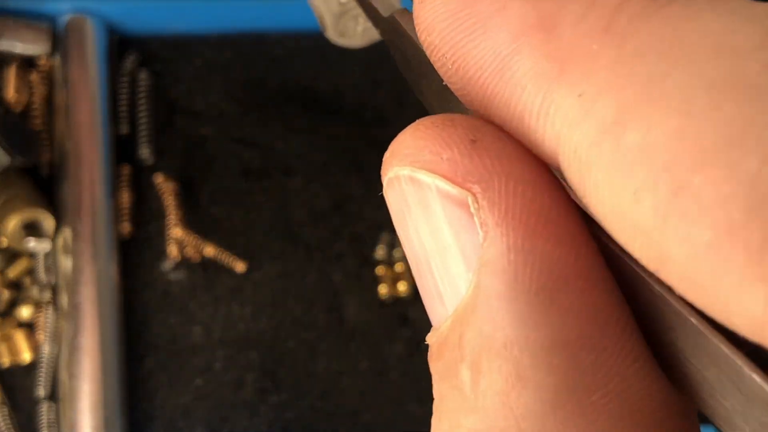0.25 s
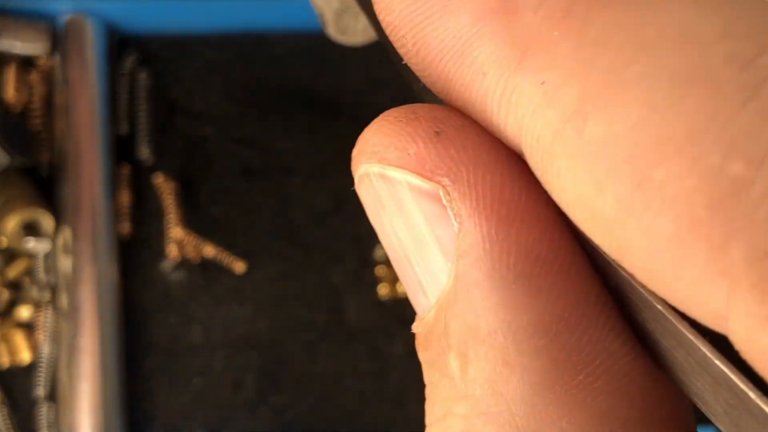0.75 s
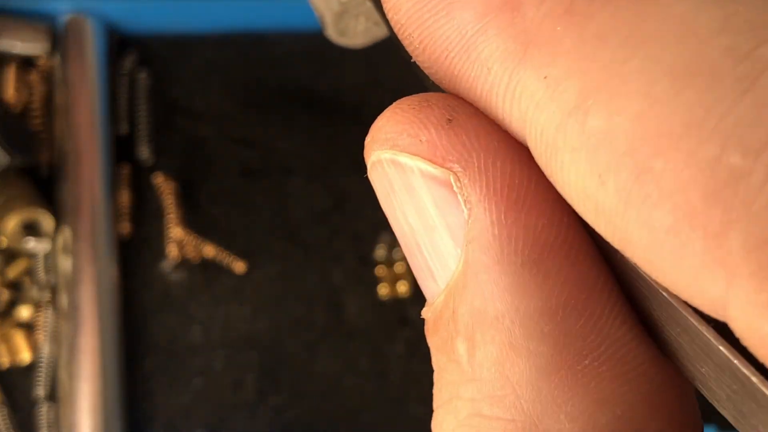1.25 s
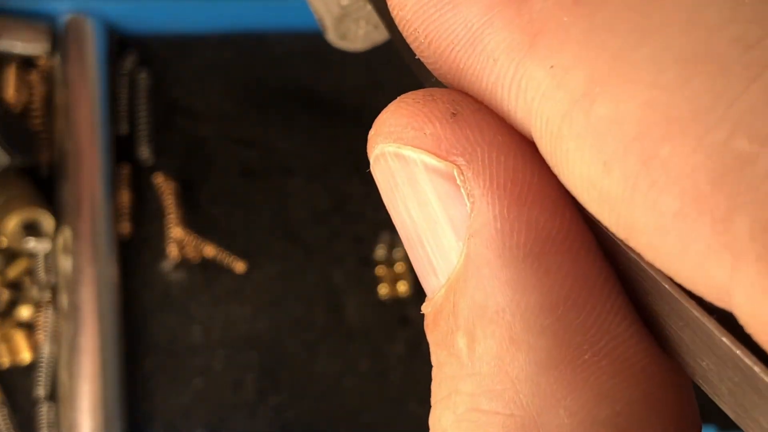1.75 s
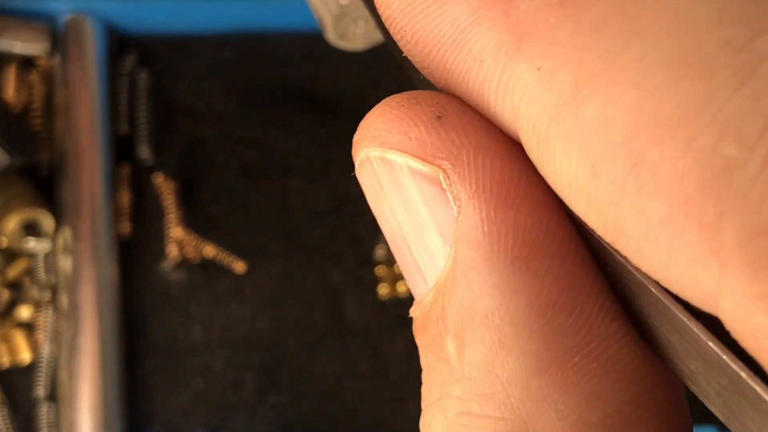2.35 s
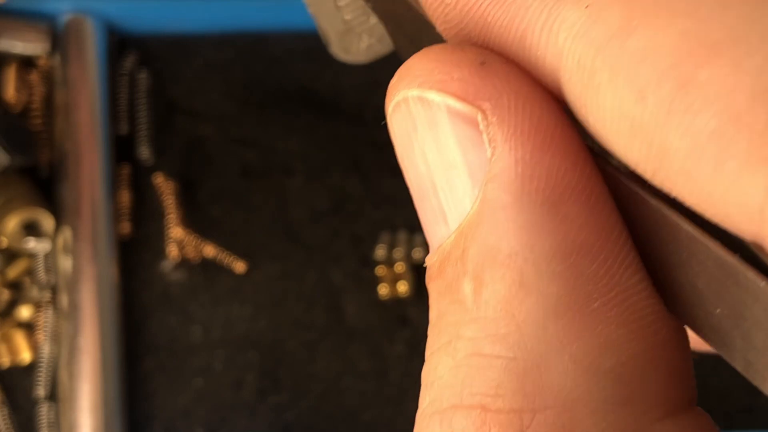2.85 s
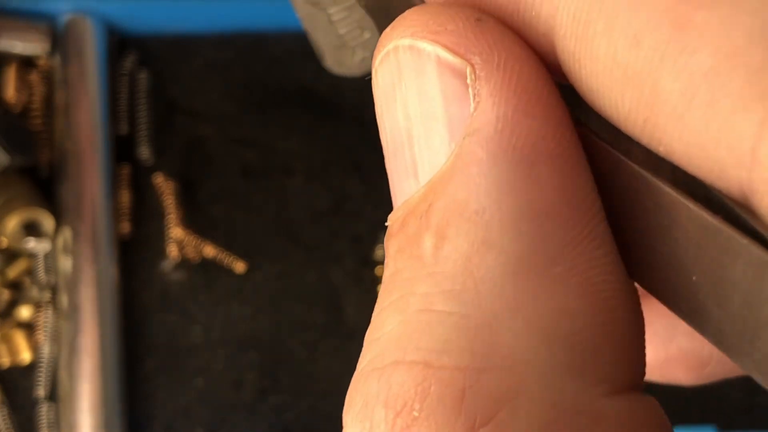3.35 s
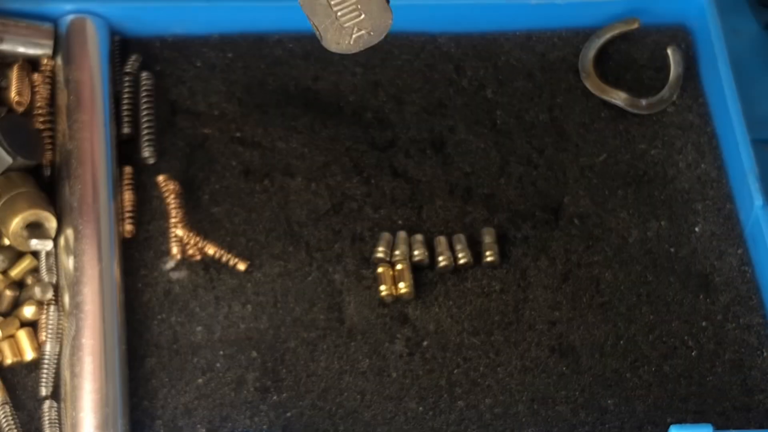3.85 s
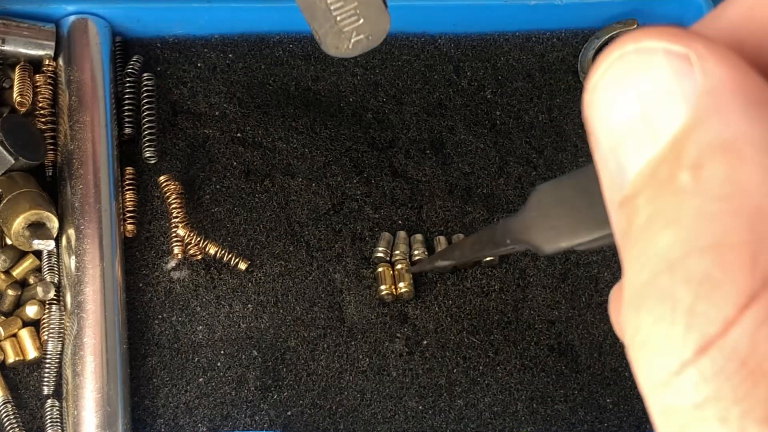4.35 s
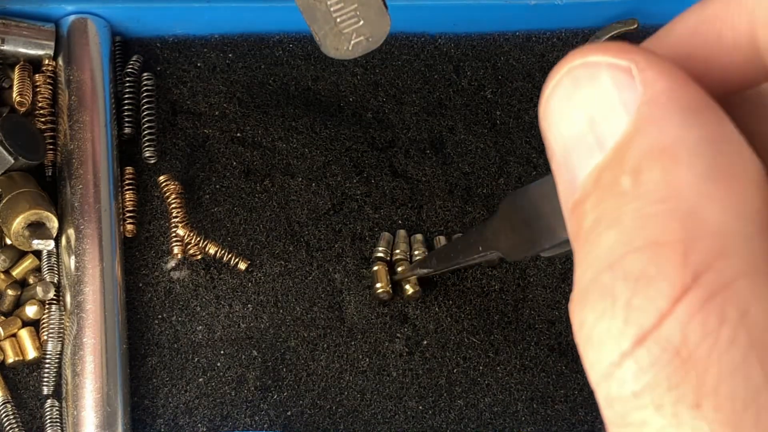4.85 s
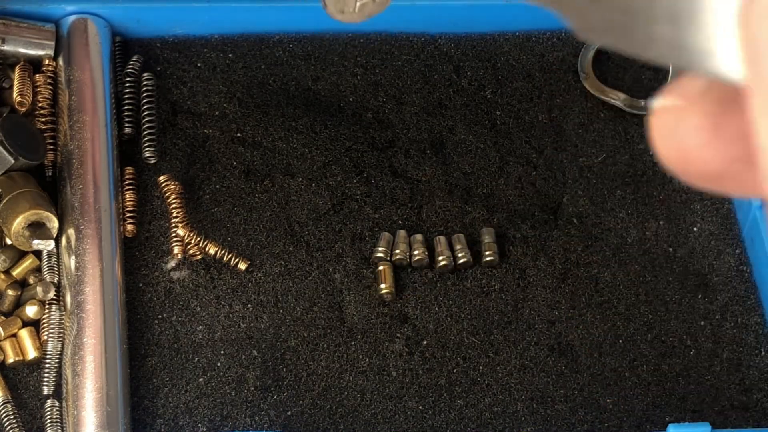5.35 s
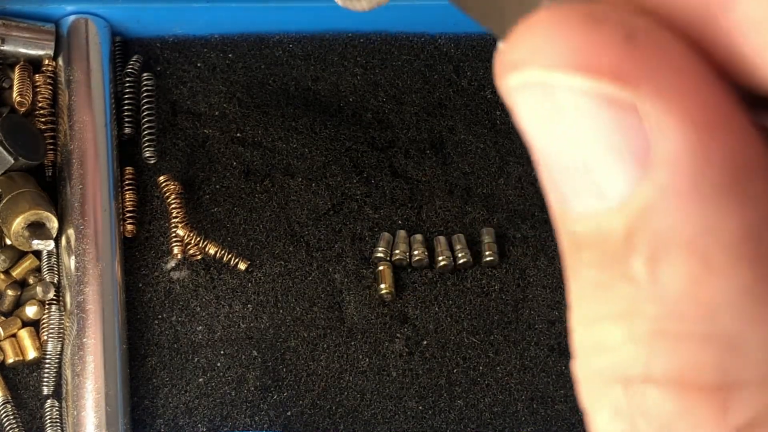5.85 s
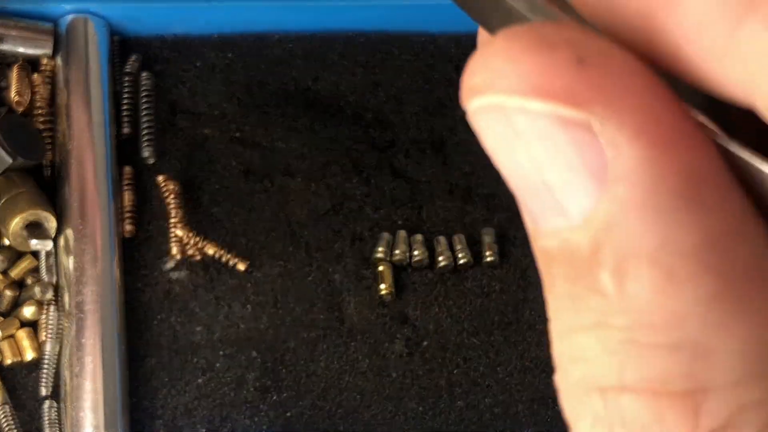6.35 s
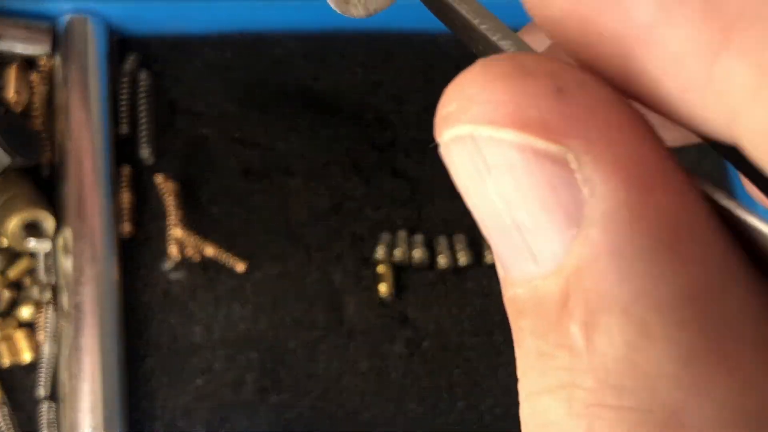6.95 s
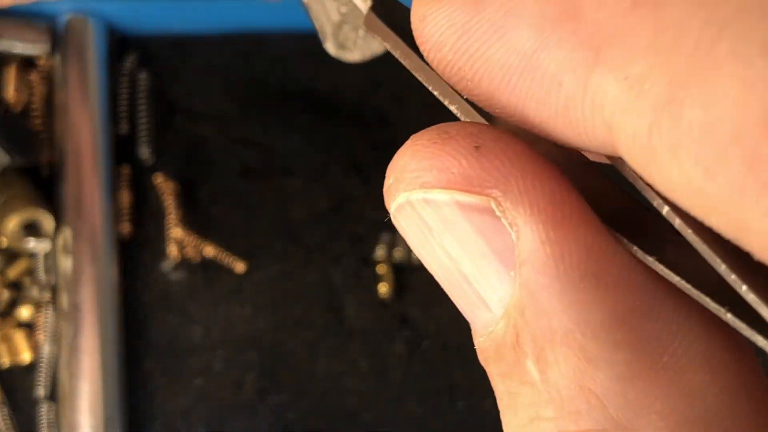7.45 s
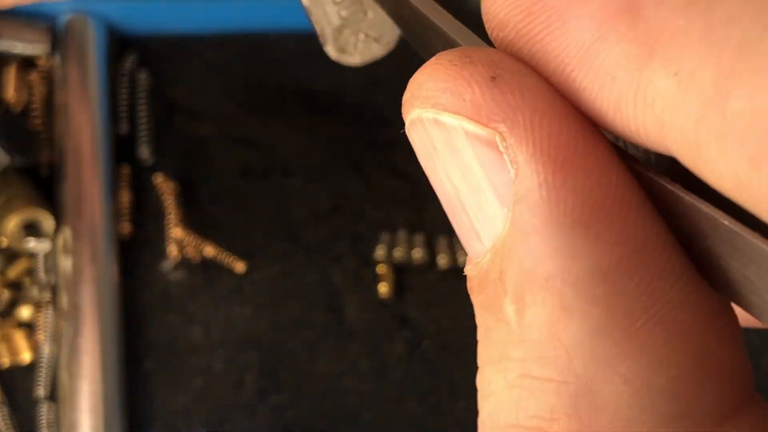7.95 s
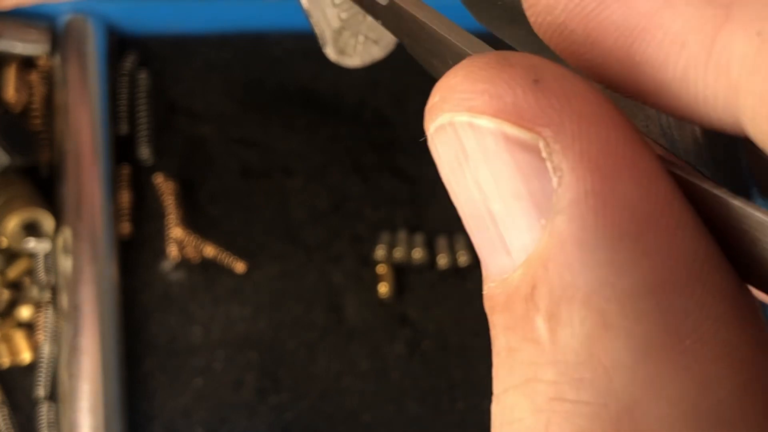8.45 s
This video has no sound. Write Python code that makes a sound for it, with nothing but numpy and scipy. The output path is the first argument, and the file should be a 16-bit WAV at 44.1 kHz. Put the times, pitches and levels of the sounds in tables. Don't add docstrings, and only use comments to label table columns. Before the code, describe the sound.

Soft, low ventilation rumble runs throughout, gently swelling, with faint fan hum, slight hiss and a thin high whine. Close to the microphone, steel tweezers touch small brass pins. Barely audible touches open the scene; light ticks cluster around 1.2-1.7 seconds. A sharp, bright click lands at 2.5, a stronger one at 2.96 with a brief skid, then a pin drags shortly over plastic at 3.1 and a crisp snap follows at 3.37. The middle is nearly still, with faint ticks and a soft slide around 4.7-4.9. Small ticks return from 6.2, with scraping and light pin bounces near 6.6. Gritty metallic rasps run from 7.1 to 7.35. At 7.8-8.15 comes the busiest, loudest burst: snaps, grips, tiny bounces and taps. Short scrapes and ticks close at 8.5-8.65. Ringing dies almost instantly, with a tiny dry room tail; loud clicks briefly dip the background.

```python
import sys
import numpy as np
from scipy import signal
from scipy.fft import rfft, irfft
from scipy.io import wavfile
from scipy.ndimage import uniform_filter1d

SR = 44100
rng = np.random.default_rng(int(sys.argv[2]) if len(sys.argv) > 2 else 0)


def amplitude_ratio(level_db):
    exponent = np.asarray(level_db, float) / 20
    return 10 ** exponent


def put_to_file(sound):
    columns = np.atleast_2d(sound).T
    safe = np.clip(columns, -1, 1)
    whole_steps = np.round(safe * 32767)
    wavfile.write(sys.argv[1], SR, whole_steps.astype(np.int16))


N = 383669

# (frequency [Hz], width [Hz], level [dB])
STRUCK = [
    [(13300, 600, -3), (14400, 400, -6), (15350, 400, 0), (16300, 700, -16)],
    [(8370, 700, -8), (9600, 700, -9), (10700, 600, -6), (11900, 700, -8)],
    [(3100, 800, -11), (3850, 600, -5), (4500, 600, -6), (5710, 500, -8), (7000, 700, -8)],
    [(950, 450, -4), (1600, 500, -1), (2260, 400, -2)],
]
# (frequency [Hz], width [Hz], level [dB])
RUBBED = [
    [(14200, 450, -6), (15450, 350, 0)],
    [(8700, 500, -10), (10000, 500, -1), (11800, 500, 0)],
    [(3500, 400, -11), (4150, 350, -2), (5750, 300, -3), (7250, 350, -5)],
    [(1530, 200, -4), (2120, 200, 0)],
]
# (frequency [Hz], width [Hz], level [dB])
RASPED = [
    [(14200, 300, -12), (15420, 260, 0)],
    [(8500, 350, -10), (9450, 350, -8), (10600, 500, -11), (11550, 300, -6), (12150, 280, 0)],
    [(3060, 200, -9), (4650, 300, 0), (5900, 300, -8), (6970, 300, -4)],
    [(2060, 170, 0)],
]
# (frequency [Hz], width [Hz], level [dB])
LOOSE_PIN = [
    [(14200, 250, -12), (15000, 200, 0), (15600, 250, -10)],
    [(9590, 300, -9), (10500, 260, 0)],
]
# tips, pin, arms, tray (level [dB])
SLIDE_PARTS_DB = (2, 0, -5, -17)


def evened(x):
    return x / np.sqrt(np.mean(x ** 2) + 1e-20)


def play(events, make_sound):
    track = np.zeros(N)
    for start_s, *settings in events:
        sound = make_sound(*settings)
        part = track[round(start_s * SR):][:len(sound)]
        part += sound[:len(part)]
    return track


def ring(drive, modes, spread):
    t = np.arange(900) / SR
    luck = rng.standard_normal((len(modes), 2))
    body = np.zeros(len(t))
    for (hz, width_hz, db), (detune, louder) in zip(modes, luck):
        level = amplitude_ratio(db + spread * 170 * louder) * width_hz ** 2
        swell_and_fade = t * np.exp(-5 * width_hz * t)
        body += level * swell_and_fade * np.sin(2 * np.pi * hz * (1 + spread * detune) * t)
    return signal.fftconvolve(drive, body)


def contact(t60, rattle):
    t = np.arange(1200) / SR
    fade = amplitude_ratio(-60 * abs(t - .0009) / t60) * np.minimum(t / 0.001, 1) ** 2
    drive = rattle * rng.standard_normal(len(t)) * fade
    drive[40] += 1
    return drive


def strike(drive, parts, peaks_db):
    rung = [ring(drive, modes, spread=.006) for modes in parts]
    return sum(amplitude_ratio(db) * r / abs(r).max() for db, r in zip(peaks_db, rung))


def tick(body, favoured_hz, tips_db, pin_db, arms_db, arms_hz):
    tips, pin, arms, tray = body
    tips_hz, pin_hz = np.multiply(favoured_hz, 1 + .015 * rng.standard_normal(2))
    tips = tips + [(tips_hz, 400, 2)]
    pin = pin + [(pin_hz, 380, -2)]
    arms = arms + [(arms_hz, 330, 0)]
    peaks_db = tips_db, pin_db + 6.0, arms_db + 8.0, arms_db - 2.5
    return strike(contact(t60=.009, rattle=.12), (tips, pin, arms, tray), peaks_db)


def stroke(press_s, release_s, peak_db):
    t = np.arange(0, press_s + release_s, 1 / SR)
    db = np.interp(t, (0, press_s, press_s + release_s), (-17.5, 0, -16.5))
    return amplitude_ratio(peak_db + db) * signal.windows.tukey(len(t), .15)


def rub(body, levels_db, fade):
    unevenness, grains = rng.standard_normal((2, SR // 4))[:, :len(fade)]
    drive = amplitude_ratio(2.0 * evened(uniform_filter1d(unevenness, size=90))) * grains
    rung = [evened(ring(drive, modes, spread=0.003)[:len(fade)]) for modes in body]
    return fade * sum(amplitude_ratio(db) * r for db, r in zip(levels_db, rung))


def slide(body, parts_db, press_s, release_s, peak_db, weight):
    weight_db = np.array((0.1, 0.1, 8.8, 14.2))
    return rub(body, np.add(parts_db, weight * weight_db), stroke(press_s, release_s, peak_db))


def air():
    # (time [s], level [dB])
    swell = [(0.0, -54), (0.63, -52), (1.26, -49.5), (1.67, -51), (2.64, -51), (3.0, -52), (3.75, -50.5),
             (4.63, -52.5), (5.06, -49), (5.82, -51.5), (6.15, -49), (6.44, -52), (7.25, -50), (7.9, -54.5),
             (8.38, -50.5), (8.7, -49)]
    # (frequency [Hz], level [dB per Hz])
    air_colour = [(18, -19), (30, -13.5), (59, 2), (244, -3.5), (309, -12.5), (343, -6.5), (495, -13.5),
                  (643, -15.5), (1210, -24), (2640, -31), (4350, -31), (11200, -39), (12100, -36.5),
                  (15700, -38)]
    frames, hz = N // 256 + 5, np.fft.rfftfreq(1024, 1 / SR)
    a, b, patches = rng.standard_normal((frames, 513, 3)).T
    patches = uniform_filter1d(uniform_filter1d(patches, size=8, axis=0), size=20, axis=1)
    patches = evened(patches)
    s, swell_db = np.transpose(swell)
    swell_db = np.interp(np.arange(frames) * 256 / SR, s, swell_db - swell_db.mean())
    share = 1 / (1 + (hz / 1500) ** 2)
    f, db = np.transpose(air_colour)
    colour = np.interp(np.log(hz + 1), np.log(f + 1), db) - 60 * (hz > 15850)
    z = (a + 1j * b) * amplitude_ratio(colour[:, None] + 1.2 * patches + share[:, None] * swell_db)
    return amplitude_ratio(-49) * evened(signal.istft(z, nperseg=1024, noverlap=768)[1][:N])


def fan():
    # (frequency [Hz], width [Hz], level [dB])
    fan_tones = [(299, 14, -63), (340, 15, -61), (637, 12, -67), (735, 12, -76), (900, 10, -73.5),
                 (4420, 250, -79), (10300, 300, -85)]
    hz = np.fft.rfftfreq(N, 1 / SR)
    shape = np.zeros(len(hz))
    for f, width_hz, db in fan_tones:
        gain = amplitude_ratio(db) * np.sqrt(2 * SR / (np.pi * width_hz))
        shape += gain / (1 + (2 * (hz - f) / width_hz) ** 2)
    return irfft(rfft(rng.standard_normal(N)) * shape, N)


def whine():
    # (frequency [Hz], level [dB])
    whine_tones = [(3924, -78.5), (11771, -72.5)]
    t = np.arange(N) / SR
    return sum(amplitude_ratio(db) * np.sqrt(2) * np.sin(2 * np.pi * hz * t) for hz, db in whine_tones)


def touches():
    # (time [s], tips peak [dB], arms [dB], loudest arm tone [Hz])
    touch_events = [(0.057, -51, -63, 3920), (0.1078, -57, -61, 3920), (0.825, -43, -55, 7360),
                    (1.234, -40, -43, 4400), (1.4078, -55, -49, 4500), (1.5529, -52, -61, 4480),
                    (1.565, -46, -51, 4220), (1.617, -44, -53, 3960), (1.6208, -42, -52, 4310),
                    (1.6344, -55, -53, 4300), (1.6774, -51, -48, 3960), (1.6804, -52, -58, 3940),
                    (2.5598, -61, -55, 4440), (2.7287, -37, -49.5, 4620), (2.738, -56, -53, 3960),
                    (2.751, -53, -49.5, 5330), (2.966, -27, -57, 3780), (1.527, -60, -64, 4300),
                    (2.756, -59, -57, 4400), (6.4547, -53, -61, 4860), (6.4684, -41, -55, 4300),
                    (6.484, -44, -57, 4480), (6.4966, -43, -52, 3920), (7.839, -46, -64, 4300),
                    (7.8748, -29, -45, 7260), (7.9993, -32, -48, 4190), (8.0331, -44, -48.5, 4330),
                    (8.1244, -42, -49, 4140), (8.1474, -49, -58, 4300), (8.6434, -35, -51, 5670)]

    def touch(tips_db, arms_db, arms_hz):
        pin_db = tips_db + 0.49 * (arms_db - tips_db) - 3
        return tick(STRUCK, (14200, 10700), tips_db, pin_db, arms_db, arms_hz)
    return play(touch_events, touch)


def held_slides():
    # (time [s], press [s], release [s], peak [dB], weight on the tray [1 = full])
    slide_events = [(0.085, .015, .025, -59.5, 0.3), (0.316, .016, .014, -67, .6),
                    (3.345, 0.019, .003, -53, 0.9), (2.95, .009, .002, -48, .2),
                    (7.812, 0.0086, 0.0087, -46, 1.06), (7.83, 0.0073, .02, -58, 0.4),
                    (8.039, 0.035, .019, -61, .8), (8.189, 0.024, .017, -61, .2),
                    (8.565, 0.024, 0.018, -50.5, .7), (8.585, 0.022, 0.017, -38.5, 0.54),
                    (8.612, .02, 0.019, -48, 0.6)]
    tips, pin, arms, tray = RUBBED
    held = tips, pin, arms + [(4400, 350, -6)], tray
    return play(slide_events, lambda *row: slide(held, SLIDE_PARTS_DB, *row))


def nudges():
    # (time [s], tips peak [dB], pin [dB], arms [dB], loudest arm tone [Hz])
    nudge_events = [(1.2221, -39, -39, -40, 4300), (1.2383, -39, -48, -40, 7130),
                    (1.3927, -38, -38, -46, 5700), (1.6112, -38, -42, -44.5, 4250),
                    (1.6726, -38, -39.5, -40, 4170), (2.3456, -37, -35, -39, 4320),
                    (2.4922, -14, -21.5, -23.5, 4230), (7.9453, -11.5, -24.5, -29.5, 4270),
                    (4.7233, -52, -57, -48, 7440), (4.7274, -54, -59, -53, 7180)]
    favoured_hz = 14200, 10700
    return play(nudge_events, lambda *row: tick(STRUCK, favoured_hz, *row))


def skids():
    # (time [s], length [s], dull hiss [dB], bright hiss [dB])
    skid_events = [(2.503, 0.069, -67, -58), (2.967, 0.054, -54, -49), (3.384, .045, -51, -53),
                   (7.87, 0.055, -56, -40), (7.954, 0.059, -55, -48)]
    dull_band = signal.butter(1, (900, 7000), "band", fs=SR, output="sos")
    bright_band = signal.butter(2, (6000, 15500), "band", fs=SR, output="sos")

    def skid(length_s, dull_db, bright_db):
        t = np.arange(0, length_s, 1 / SR)
        bite = np.exp(-t / 0.011)
        noise = rng.standard_normal(SR // 8)[:len(t)]
        dull = evened(signal.sosfilt(dull_band, noise))
        bright = evened(signal.sosfilt(bright_band, noise))
        hiss = amplitude_ratio(dull_db + 3 * bite) * dull + amplitude_ratio(bright_db - 20 * (1 - bite)) * bright
        return signal.windows.tukey(len(t), .15) * hiss
    return play(skid_events, skid)


def grips():
    # (time [s], tips peak [dB], pin [dB], arms [dB], loudest arm tone [Hz])
    grip_events = [(2.9602, -5.5, -18, -24, 5670), (4.6483, -39, -38, -49, 4190),
                   (6.2133, -39, -44, -43, 5300), (6.336, -39, -38.5, -42.5, 5270),
                   (6.4772, -27, -41, -43.5, 4150), (7.7258, -37, -47, -55, 4260),
                   (7.862, -4, -20, -31, 3980)]
    favoured_hz = 15250, 12000
    return play(grip_events, lambda *row: tick(STRUCK, favoured_hz, *row))


def dragged_pin():
    # (time [s], press [s], release [s], peak [dB])
    drag_events = [(3.124, 0.0091, 0.018, -38)]
    # (frequency [Hz], width [Hz], level [dB])
    dragged_tray = [(3060, 590, -2.5), (3360, 310, 2), (4400, 480, -4), (5800, 1300, -11)]
    drag_parts_db = (-2, -10.5, -5)
    body = LOOSE_PIN + [dragged_tray]
    return play(drag_events, lambda *row: rub(body, drag_parts_db, stroke(*row)))


def snaps():
    # (time [s], tips peak [dB], pin [dB], arms [dB], loudest arm tone [Hz])
    snap_events = [(3.3681, -11, -19, -24.5, 4600), (3.3711, -23, -24, -35, 2300),
                   (3.376, -34, -43, -37, 4080), (5.9382, -50, -49, -47, 6740),
                   (6.4954, -33, -38.5, -51, 3800), (7.3771, -55, -46, -68, 3930),
                   (7.5338, -41, -48, -52, 7300), (7.8281, -23, -33, -35, 4050),
                   (7.8573, -5, -15.5, -35, 3800), (7.8575, -40, -23, -37, 1110),
                   (7.8635, -30, -30, -37.5, 2260), (7.988, -21, -32.5, -38.5, 4160)]
    favoured_hz = 15350, 10300
    return play(snap_events, lambda *row: tick(STRUCK, favoured_hz, *row))


def open_slides():
    # (time [s], press [s], release [s], peak [dB], weight on the tray [1 = full])
    open_events = [(4.74, .025, .021, -55, 0.5), (6.545, .03, 0.038, -57.5, 1),
                   (6.575, 0.028, .003, -53.5, 0.85), (6.62, .03, .06, -62, .1),
                   (4.93, .02, .03, -70.5, 1.3)]
    # (frequency [Hz], width [Hz], level [dB])
    open_tips = [(14200, 450, 0), (15450, 350, -7)]
    body = [open_tips] + RUBBED[1:]
    return play(open_events, lambda *row: slide(body, SLIDE_PARTS_DB, *row))


def bounces():
    # (time [s], upper tones peak [dB], lower tones [dB])
    bounce_events = [(6.598, -41, -48), (6.6068, -26, -36.5), (6.623, -31, -43), (6.632, -39, -49),
                     (6.6548, -47, -58), (7.8824, -30, -50), (7.8874, -40, -47), (7.9174, -46, -45),
                     (7.929, -27, -36), (7.9335, -18, -34), (7.9504, -25, -47), (7.9604, -39, -44),
                     (7.9644, -30, -52), (7.9764, -29, -42)]

    def bounce(upper_db, lower_db):
        return strike(contact(t60=0.017, rattle=0.087), LOOSE_PIN, (upper_db, lower_db + 4.5))
    return play(bounce_events, bounce)


def catches():
    # (time [s], tips peak [dB], pin [dB], arms [dB], loudest arm tone [Hz])
    catch_events = [(7.0934, -13, -22.5, -42, 6020), (7.1173, -22, -36, -46, 4550),
                    (7.29, -50, -37, -53, 6900), (7.3146, -38, -41, -58, 4620),
                    (8.4933, -32, -43, -51, 5900), (8.5024, -34, -49, -50, 4140),
                    (8.513, -43, -57, -56, 4400), (8.5797, -34, -53, -56, 4260),
                    (8.585, -32, -51, -54, 4270), (8.6046, -21, -33, -52, 4020),
                    (8.63, -37, -40, -46, 4000)]
    favoured_hz = 15450, 12000
    return play(catch_events, lambda *row: tick(RASPED, favoured_hz, *row))


def rasps():
    # (time [s], press [s], release [s], peak [dB], weight on the tray [0-1])
    rasp_events = [(7.094, 0.0068, .022, -35.5, 0.4), (7.104, 0.019, 0.015, -35.5, 0.5),
                   (7.148, .018, 0.032, -42, 0.42), (7.214, 0.022, 0.023, -43.5, 0.43),
                   (7.238, .016, 0.063, -48, 0.4), (7.275, 0.02, 0.037, -50, .9),
                   (7.295, 0.023, .045, -50, .6), (7.325, .02, .02, -57, .6), (7.125, .015, .03, -62, 0.7),
                   (8.493, 0.0033, 0.034, -45, 0.55), (8.51, 0.018, 0.046, -61, .6)]
    # tips, pin, arms, tray (level [dB])
    rasp_parts_db = (-1.5, -1.5, -12.5, -22)
    return play(rasp_events, lambda *row: slide(RASPED, rasp_parts_db, *row))


def room(x):
    t = np.arange(SR // 4) / SR
    t60_s = .06
    tail = rng.standard_normal(len(t)) * amplitude_ratio(-60 * t / t60_s) * (t > .003)
    tail = signal.lfilter([1], [1, -.6], tail)
    return amplitude_ratio(-23) * signal.fftconvolve(x, tail / np.linalg.norm(tail))[:N]


def scene():
    steady = air() + fan() + whine()
    metal = touches() + held_slides() + nudges() + skids() + grips() + dragged_pin()
    metal += snaps() + open_slides() + bounces() + catches() + rasps()
    no_bass = signal.butter(2, 750, "high", fs=SR, output="sos")
    metal = signal.sosfilt(no_bass, metal)
    return (metal + room(metal) + steady)[None]


def low_pass(x):
    return signal.sosfilt(signal.butter(12, 17310, fs=SR, output="sos"), x)


def record(dry):
    power_db = 10 * np.log10(abs(uniform_filter1d(dry[0] ** 2, size=900)) + 1e-12)
    fall = np.arange(N) * 13.3 / SR
    held_db = np.maximum.accumulate(power_db + fall) - fall
    over_db = np.maximum(held_db + 29.5, 0)
    late_db = np.interp(np.arange(N) - 0.038 * SR, np.arange(N), uniform_filter1d(over_db, size=300))
    rumble_cut = signal.butter(3, 44, "high", fs=SR, output="sos")
    ducked = signal.sosfilt(rumble_cut, dry) / amplitude_ratio(.15 * late_db)
    treble_cut = signal.firwin(121, 16200, window=("kaiser", 6), fs=SR)
    mix = signal.oaconvolve(ducked, treble_cut[None], "same")
    return low_pass(mix)


dry = scene()
out = record(dry)
put_to_file(out)
```